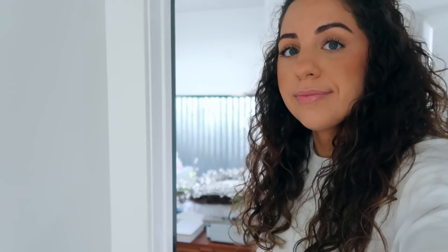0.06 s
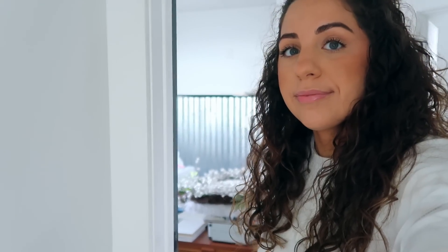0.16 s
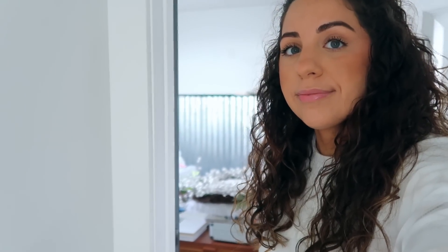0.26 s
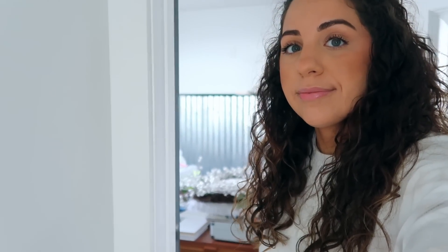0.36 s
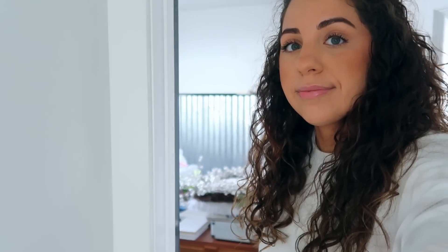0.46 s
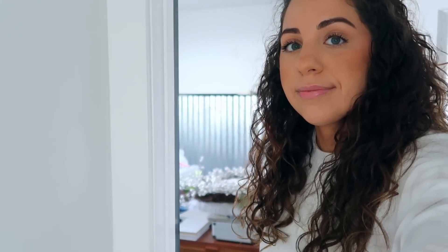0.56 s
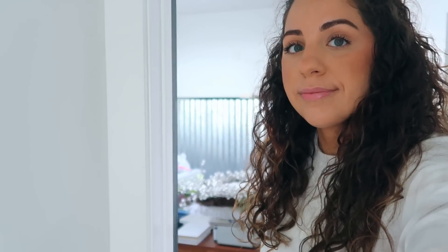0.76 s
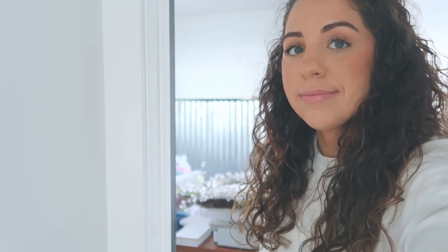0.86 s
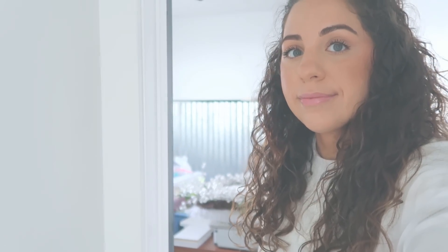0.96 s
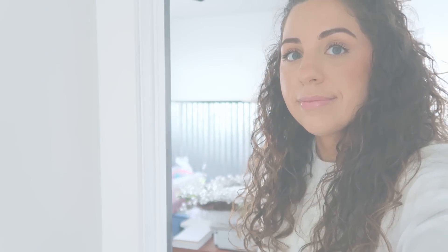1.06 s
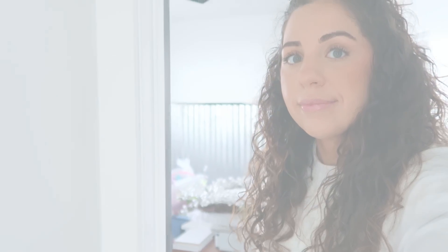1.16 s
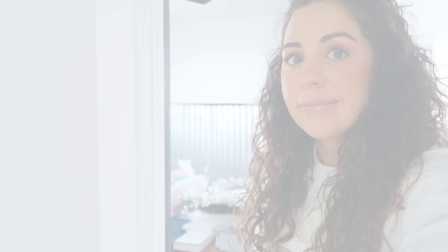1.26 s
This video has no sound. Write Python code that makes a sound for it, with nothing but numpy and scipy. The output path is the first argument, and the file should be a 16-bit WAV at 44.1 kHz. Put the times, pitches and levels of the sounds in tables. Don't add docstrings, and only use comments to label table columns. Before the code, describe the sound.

A dry door hinge squeaks: one short pure high note, then a raspy climbing creak

```python
import sys
import numpy as np
from scipy import signal
from scipy.fft import rfft, irfft
from scipy.io import wavfile
from scipy.ndimage import uniform_filter1d

SR = 44100
rng = np.random.default_rng(int(sys.argv[2]) if len(sys.argv) > 2 else 0)


def dump_mix(stems):
    frames = np.atleast_2d(stems).T
    limited = np.clip(frames, -1, 1)
    pcm = np.round(limited * 32767).astype(np.int16)
    wavfile.write(sys.argv[1], SR, pcm)


def linear_from_db(decibels):
    return 10 ** (np.asarray(decibels, float) / 20)


N = 57330


def band(x, hz, width_hz):
    return signal.lfilter(*signal.iirpeak(hz, hz / width_hz, fs=SR), x)


def cut(x, hz, kind, order):
    return signal.sosfilt(signal.butter(order, hz, kind, fs=SR, output="sos"), x)


def unit(x):
    return x / np.sqrt(np.mean(x ** 2))


def walk(rate_hz):
    hold = int(SR / rate_hz)
    held = np.repeat(rng.standard_normal(N // hold + 1), hold)
    return 1.6 * uniform_filter1d(uniform_filter1d(held, hold), hold)[:N]


def air(points, level_db):
    flicker_db, flicker_hz = 1.3455, 6.4
    hz = np.fft.rfftfreq(N, 1 / SR) + 1
    point_hz, point_db = np.array(points).T
    colour = linear_from_db(np.interp(np.log(hz), np.log(point_hz), point_db))
    out = 0
    for octave in np.arange(4, 14.5, .5):
        share = np.sqrt(np.clip(1 - 2 * np.abs(np.log2(hz) - octave), 0, 1))
        noise = irfft(rfft(rng.standard_normal(N)) * colour * share, N)
        out = out + noise * linear_from_db(flicker_db * walk(flicker_hz))
    return unit(out) * linear_from_db(level_db)


def hum():
    return unit(band(rng.standard_normal(N), 86.93, 4)) * linear_from_db(-55.5)


def phone(t):
    # [start t/s, end t/s, step rate/Hz]
    lens_runs = [
        (0, .42, 45),
        (.76, .92, 55),
        (1.26, 1.3, 40),
    ]
    whine_hz, whine_width_hz, whine_db = 13050, 60, -70.5
    lens_hz, lens_width_hz, lens_db, lens_spread_db = 4250, 300, -51.5, 2.5
    whine = band(band(rng.standard_normal(N), whine_hz, whine_width_hz), whine_hz, 300)
    rate_hz = sum(r * (t >= a) * (t < b) for a, b, r in lens_runs)
    count = np.floor(np.cumsum(rate_hz * (1 + .5 * walk(60))) / SR)
    clicks = (np.diff(count, prepend=0) > 0) * linear_from_db(lens_db + lens_spread_db * rng.standard_normal(N))
    lens = band(band(clicks, lens_hz, lens_width_hz), lens_hz, lens_width_hz)
    return unit(whine) * linear_from_db(whine_db) + lens * SR / lens_width_hz


def room(x, t):
    t60_s, treble_t60_s, split_hz = 0.516, 0.26, 3800
    early_t60_s, early_db = .12, 0
    gap_s, level_db = 0.0064, -6.5
    late_s = np.maximum(t - gap_s, 0)
    noise = rng.standard_normal(N) * (t > gap_s)
    low = signal.lfilter(*signal.butter(1, split_hz, fs=SR), noise)
    tail = low * linear_from_db(-60 * late_s / t60_s) + (noise - low) * linear_from_db(-60 * late_s / treble_t60_s)
    tail = tail * (1 + linear_from_db(early_db - 60 * late_s / early_t60_s))
    return signal.fftconvolve(x, tail / np.sqrt(np.sum(tail ** 2)))[:N] * linear_from_db(level_db)


def ports(x):
    turn_hz, bend = 8270, 1.485
    pan_db, pan_hz = -2.5, 4440
    hz = np.fft.rfftfreq(N, 1 / SR)
    gain = linear_from_db(pan_db / 2 * hz / (hz + pan_hz) * 2)
    tilt = gain * np.exp(-.5j * np.pi * np.tanh((hz / turn_hz) ** bend))
    return irfft(rfft(x) * np.array([tilt, 1 / tilt]), N)


def ticks(t):
    # [t/s, peak level/dB, ring f/Hz, decay t60/s, edge level/dB]
    tick_rows = [
        (0.191, -35.5, 1746, 0.1, -31.5),
        (0.267, -37.5, 2030, 0.1, -32),
        (0.326, -43, 1600, .07, -29.5),
        (.355, -26.5, 1444, 0.206, -28.5),
        (0.386, -42, 1884, 0.1, -33.5),
        (.9453, -25.5, 2310, .06, -10.5),
    ]
    ring_width, snap, snap_s = 0.94, 0.49, 0.0033
    edge_hz, thud_db = 7700, -6.5
    out = 0
    for start_s, peak_db, hz, t60_s, edge_db in tick_rows:
        age_s = np.maximum(t - start_s, 0)
        puff = rng.standard_normal(N) * (t > start_s) * linear_from_db(-60 * age_s / t60_s)
        puff = puff * (1 + snap * np.exp(-age_s / snap_s))
        rise_s = .02 * t60_s * (edge_db < -20) + 1 / SR
        puff = puff * np.clip((t - start_s) / rise_s, 0, 1)
        ring = band(band(puff, hz, hz * ring_width), hz, hz * ring_width)
        edge = linear_from_db(edge_db) * band(puff, edge_hz, 9000)
        tick = ring + edge + linear_from_db(thud_db) * band(puff, 740, 900)
        out = out + linear_from_db(peak_db) * tick / np.abs(tick).max()
    return cut(out, 13000, "low", order=6)


def sing(t):
    pitch_hz, level_db, octave_db = 3194.2, -14.5, -18.5
    start_s, swell_s, fade_s = 0.2038, .051, 0.0405
    peak_s = start_s + swell_s
    shape = np.interp(t, [start_s, peak_s, peak_s + fade_s], [0, np.pi / 2, np.pi])
    phase = 2 * np.pi * np.cumsum(pitch_hz * (1 + 0.00068 * walk(40))) / SR
    size = np.sin(shape) ** 2.43
    octave = linear_from_db(octave_db) * size ** 2.1 * np.sin(2 * phase)
    return np.sqrt(2) * linear_from_db(level_db) * (size * np.sin(phase) + octave)


def leaf(force):
    # [f/Hz, width/Hz, level/dB]
    modes = [(1214.2, 251, -6.5), (1702, 191.7, 3), (2106, 577, -4.5), (2484, 302, 2.5), (2752, 234, 1.5),
             (3185, 151, 4), (3647, 127.2, 8), (4057, 106.3, 5.5), (4432, 250, 2), (4946.6, 143, 5.5),
             (5286, 182, 6), (6022, 960, -2.5), (6084, 270, 2), (7530, 1045, -10.5)]
    ring = sum((-1) ** k * linear_from_db(db) * band(force, hz, width_hz) for k, (hz, width_hz, db) in enumerate(modes))
    return cut(cut(1.2407 * ring, 955, "high", order=3), 8395, "low", order=8)


def creak(t):
    # [t/s, slip rate f/Hz, level/dB, roughness 0-1]
    catch = [
        (.441, 1982, -48, 0.01),
        (.448, 1925, -31, 0),
        (.466, 1859, -24, 0),
        (.473, 1718, -29.5, 0.2),
        (.478, 1551, -19.5, .75),
        (.484, 1122, -19, .8),
        (.489, 943.7, -21, 0),
        (.497, 826.8, -20, .05),
        (.503, 805.5, -17.5, 0.11),
    ]
    # [t/s, slip rate f/Hz, level/dB, roughness 0-1]
    swing = [
        (0.508, 834.2, -23.5, 0.13),
        (0.538, 937, -18, 0.11),
        (0.56, 949, -23, 0.12),
        (0.6, 1066, -17, 0.02),
        (0.622, 1080, -22.5, 0.14),
        (0.674, 1200, -23.5, 0.02),
        (0.69, 1170, -24.5, 0.01),
        (0.728, 1280, -24, 0.05),
        (0.752, 1299, -50, 0.01),
    ]
    release_s, wander, jitter, grit = 0.0038, 0.0034, .25, 0.25
    tilt_start_db, tilt_db_per_s = -1.5, -22
    flutter_db, flutter_hz = 2.0382, 129.56
    rows = np.array(list(catch) + list(swing)).T
    start_s, end_s = rows[0, 0], rows[0, -1]
    hz, level_db, rough = (np.interp(t, rows[0], r) for r in rows[1:])
    rough = np.clip(rough, 0, 1)
    hz = uniform_filter1d(hz, size=100) * (1 + wander * walk(90) + jitter * rough ** 2 * walk(900))
    phase = 2 * np.pi * np.cumsum(hz) / SR
    tilt_db = tilt_start_db + tilt_db_per_s * (t - start_s)
    slips = 0
    for k in range(1, 15):
        size = linear_from_db(tilt_db * np.log2(k) + flutter_db * walk(flutter_hz))
        slips = slips + size * np.cos(k * phase) * (k * hz < SR / 3)
    slips = slips * (1 + rough * grit * rng.standard_normal(N))
    gate = (t > start_s) * np.exp(-np.maximum(t - end_s, 0) / release_s)
    return leaf(slips * linear_from_db(level_db) * gate)


def scene():
    # [f/Hz, level/dB]
    mid_colour = [(20, -5.5), (90, -3), (330, -7.5), (800, -13.5), (3660, -21.5), (8400, -35),
                  (12000, -39.5), (13500, -62)]
    # [f/Hz, level/dB]
    side_colour = [(20, -31), (320, -11), (700, -21), (1100, -22), (3600, -31), (8400, -41.5), (12000, -46),
                   (14500, -56.5)]
    t = np.arange(N) / SR
    note = sing(t)
    rest = creak(t) + ticks(t)
    send = rest + linear_from_db(-3.5) * note
    tail = cut(room(send, t), 4480, "low", order=1)
    wide = signal.lfilter(*signal.butter(1, 4000, "high", fs=SR), room(send, t)) * linear_from_db(-8)
    mid = tail + air(mid_colour, -45.5) + hum()
    side = wide + air(side_colour, -48) + phone(t)
    return ports(note + rest) + mid + side * np.array([[1], [-1]])


def top_cut(x):
    return signal.sosfilt(signal.butter(12, 14100, fs=SR, output="sos"), x)


def record(dry):
    return top_cut(dry)


dry = scene()
out = record(dry)
dump_mix(out)
```